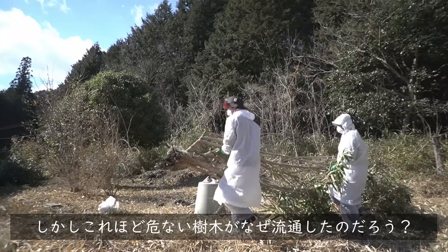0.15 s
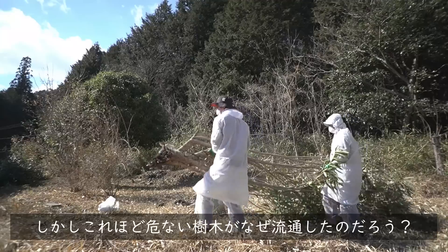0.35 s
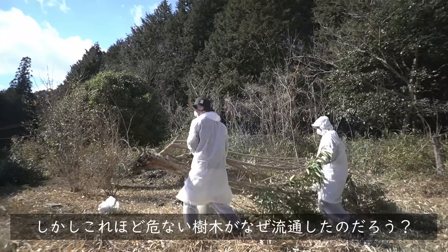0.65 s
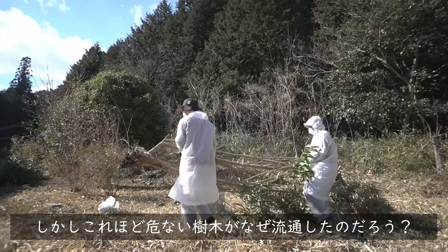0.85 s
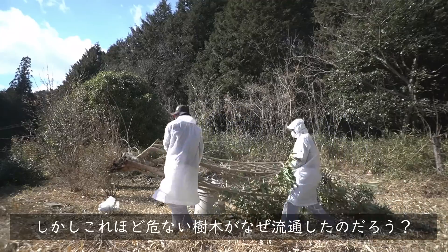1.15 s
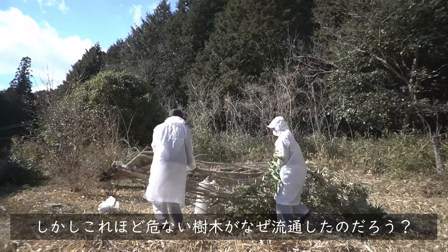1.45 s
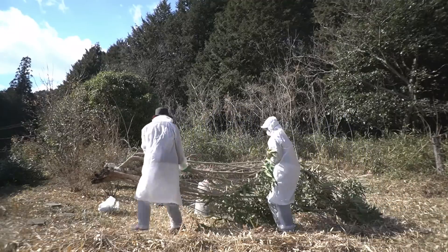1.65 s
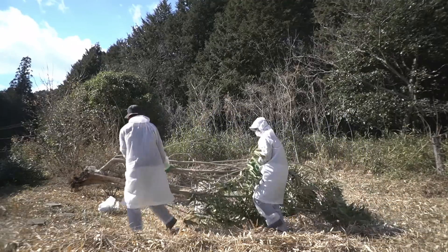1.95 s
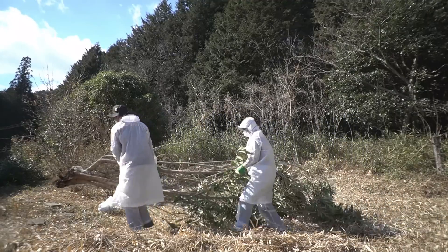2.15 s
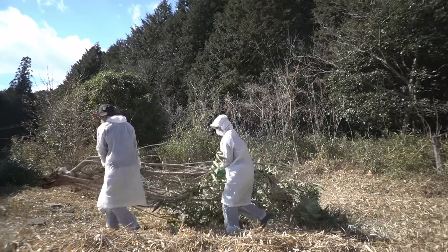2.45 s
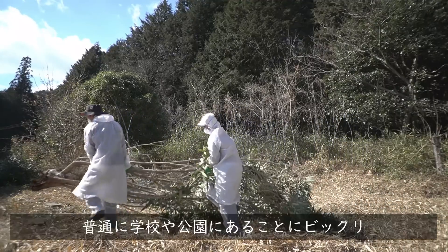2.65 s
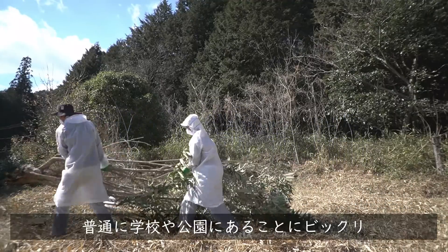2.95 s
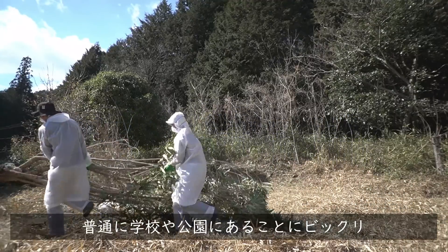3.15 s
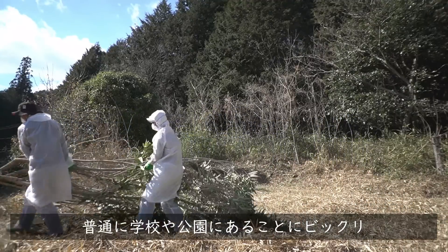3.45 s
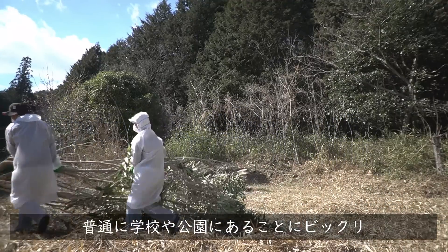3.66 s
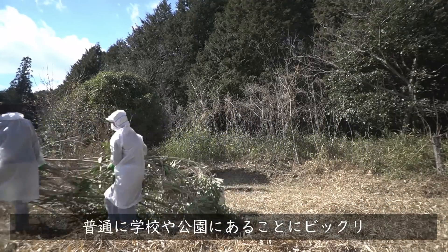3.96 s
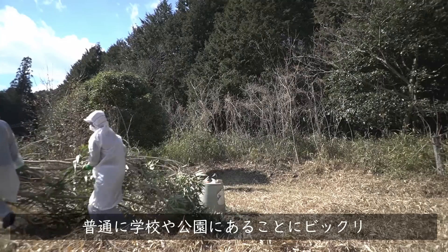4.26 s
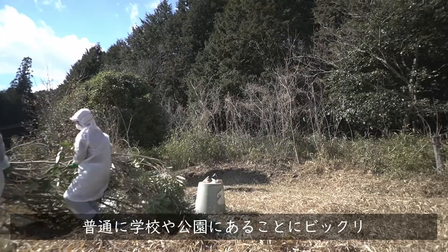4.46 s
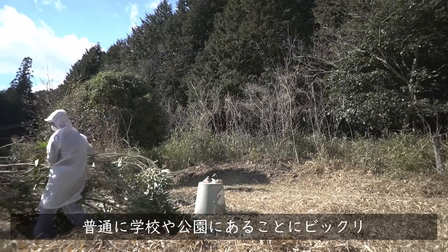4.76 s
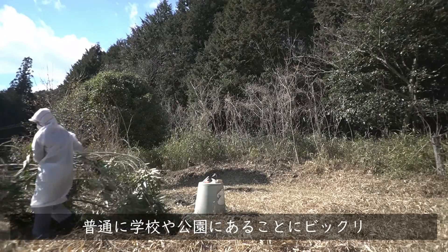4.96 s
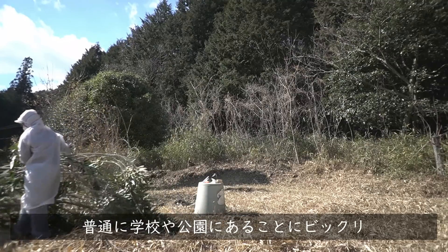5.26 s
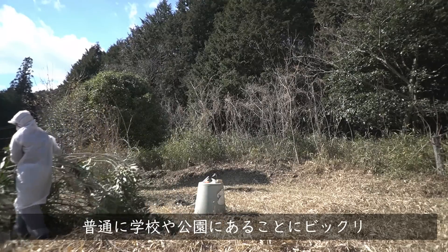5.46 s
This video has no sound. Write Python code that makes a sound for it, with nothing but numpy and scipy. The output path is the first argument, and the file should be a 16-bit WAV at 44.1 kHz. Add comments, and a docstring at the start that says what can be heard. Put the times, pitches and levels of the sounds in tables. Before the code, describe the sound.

Cut branches scrape and rustle through dry straw, beginning at the right with a few hollow bough knocks. The rustle grows fuller and brighter as it passes the middle, with leafy swishes, irregular dull footsteps and tiny high snaps, then moves left and eases slightly. Natural stereo pickup, open air, only a very short diffuse scatter and faint distant rumble.

```python
"""In a clearing, two people drag a load of leafy cut branches over dry grass, right to left past a microphone pair.
Leaves and straw crackle: dense random fractures, coloured and grouped into flurries, swish as sprays whip free.
Boughs scrape the soil (filtered slips) and knock together (damped resonances with a noisy scuff).
Boots thud on the turf (resonant noise) and crush straw; single dry stalks snap (short high resonances).
A faint outdoor rumble of low noise lies behind, and the clearing scatters a brief diffuse tail."""
import sys
import numpy as np
from scipy import signal
from scipy.fft import rfft, irfft, next_fast_len
from scipy.io import wavfile
from scipy.ndimage import uniform_filter1d

SR = 44100
rng = np.random.default_rng(int(sys.argv[2]) if len(sys.argv) > 2 else 0)


def log_audio(samples):
    """Write samples as a 16-bit WAV file to the path given in sys.argv[1]."""
    # one column per channel
    frames = np.atleast_2d(samples).T
    # limit to full scale, then quantise
    limited = np.clip(frames, -1, 1)
    pcm = np.round(limited * 32767).astype(np.int16)
    wavfile.write(sys.argv[1], SR, pcm)


N = 246519
TIME = np.arange(N) / SR


def undb(db):
    """Decibels to gain."""
    return 10 ** (np.asarray(db) / 20)


def unit(x):
    """Scale to an rms of one."""
    return x / np.sqrt(np.mean(x ** 2))


def impulse(t):
    """A single one at time zero, to set a resonance ringing."""
    return 1.0 * (t == 0)


def curves(table):
    """The columns of a table, joined by straight lines in time."""
    s, *columns = np.transpose(table)
    return [np.interp(TIME, s, column) for column in columns]


def colour(x, points):
    """Filter by a spectrum of (Hz, dB) points, joined by straight lines over log frequency."""
    hz, db = np.transpose(points)
    size = next_fast_len(N, True)
    freqs = np.maximum(np.fft.rfftfreq(size, 1 / SR), 1)
    gain = undb(np.interp(np.log(freqs), np.log(hz), db))
    return irfft(rfft(x, size) * gain, size)[..., :N]


def ring(x, hz, spread):
    """A damped resonance, reaching from hz / spread to hz * spread."""
    spread = max(spread, 1.05)
    edges = [hz / spread, min(hz * spread, 0.45 * SR)]
    return signal.sosfilt(signal.butter(2, edges, "band", fs=SR, output="sos"), x)


def walk(rate):
    """Random levels, each held 1 / rate seconds and slewed to the next; rms 1."""
    hold = max(int(SR / rate), 1)
    held = np.repeat(rng.standard_normal(N // hold + 2), hold)
    held = held[rng.integers(hold):][:N]
    return unit(uniform_filter1d(held, hold))


def clicks(rate, scatter_db):
    """Random tiny fractures, on average `rate` a second, of unequal size and either sign."""
    size_db = scatter_db * np.clip(rng.standard_normal(N), -2, 2)
    size = undb(size_db) * rng.choice([-1, 1], N)
    return unit(size * (rng.random(N) < rate / SR))


def flurries(rate, decay_s):
    """Twigs catch and spring free: jumps of activity that die away; mean 1."""
    releases = rng.random(N) * (rng.random(N) < rate / SR)
    activity = signal.lfilter([1], [1, -np.exp(-1 / (decay_s * SR))], releases)
    return activity / activity.mean()


def swell(s, rise_s):
    """A push that builds to one over rise_s and then lets go."""
    age = np.clip((TIME - s) / rise_s, 0, 20)
    return age ** 2 * np.exp(2 * (1 - age))


def add(out, s, sound):
    """Mix a short sound in at a time."""
    start = max(int(s * SR), 0)
    out[..., start:start + sound.shape[-1]] += sound[..., :N - start]


# The microphone pair. Each row: frequency in Hz, share of the bearing heard as level,
# share of the lag between the ports, right port's excess in dB.
MICROPHONE_PORTS = [(400, 0.03, 0, -0.5), (1100, 0.67, 0.4, 0.5), (1880, 0.32, 0, 1), (2580, 0.55, 0, 2.5),
                    (3500, 0.74, 1, 1.7), (5500, 0.75, 0.88, -0.2), (9000, 0.88, 0.67, -1),
                    (14000, 0.74, 0.65, -0.5)]
PORT_LAG_PER_DB = 0.35  # samples of lead at the nearer port for each dB of bearing


def ports(x, pan_db, size=256):
    """Two close microphone ports: the nearer one hears the treble earlier and louder."""
    hz, s, frames = signal.stft(x, SR, nperseg=size)
    edges, *columns = np.transpose(MICROPHONE_PORTS)
    shade, lag, excess_db = (np.interp(hz, edges, column)[:, None] for column in columns)
    pan = np.interp(s, TIME, pan_db + np.zeros(N))
    # half of the difference goes to each port
    level = undb((shade * pan - excess_db) / 2)
    lead = np.exp(1j * np.pi * hz[:, None] / SR * lag * PORT_LAG_PER_DB * pan)
    left = level * lead
    return signal.istft(np.array([frames * left, frames / left]), SR)[1][:, :len(x)]


# Colour of the distant rumble. Each row: frequency in Hz, relative level in dB.
RUMBLE_COLOUR = [(15, -22), (30, -8), (48, -0.5), (85, 2), (135, 1), (160, -8.5), (300, -9.5), (900, -14.5),
                 (4000, -29.5)]


def air():
    """Distant low rumble, nearly alike at both ports: coloured noise with a slightly wandering level."""
    noise = rng.standard_normal(N) + undb(-21.5) * rng.standard_normal((2, N))
    return unit(colour(noise, RUMBLE_COLOUR)) * undb(-47.5 + 1.2 * walk(2.57))


# Sound scattered by ground and foliage, relative to what is sent into the clearing.
# Each row: frequency in Hz, level in dB.
SCATTER_COLOUR = [(100, -30), (300, -15), (600, -12.5), (1100, -10.5), (1800, -24), (2700, -13.5),
                  (3700, -10), (8000, -14), (16000, 1.5)]


def clearing(x, decay_s=0.0069, size=256):
    """Countless swaying twigs and blades scatter the sound into a brief diffuse tail, different at each port."""
    power = abs(signal.stft(colour(x, SCATTER_COLOUR), SR, nperseg=size)[2]) ** 2
    keep = np.exp(-size / 2 / (decay_s * SR))  # power kept from one frame to the next
    tail = np.sqrt(signal.lfilter([1 - keep], [1, -keep], power))
    paths = signal.stft(rng.standard_normal((2, N)), SR, nperseg=size)[2]
    return signal.istft(tail * paths / paths.std(), SR)[1][:, :N]


# Boots on the turf. Each row: start in seconds, reference level in dB (thud, heel and crunch are offset from it),
# pitch in Hz, time to the full weight in seconds.
BOOT_STEPS = [(0.025, -38, 65.7, 0.015), (0.985, -35.5, 320, 0.028), (1.66, -43.5, 302, 0.036),
              (1.755, -37, 280, 0.015), (2.015, -49, 50, 0.025), (2.19, -41, 378, 0.015),
              (2.315, -37.5, 310, 0.042), (2.42, -40, 72, 0.025), (2.945, -37, 300, 0.013),
              (3.135, -41, 172, 0.017), (3.405, -41.5, 340, 0.013), (3.46, -44, 109, 0.018),
              (3.99, -42, 380, .025), (4.55, -33.5, 108, 0.0142), (5.2, -40.5, 330, 0.027),
              (5.541, -33, 175, 0.011)]
# Colour of straw crushed by a boot. Each row: frequency in Hz, relative level in dB.
CRUNCH_COLOUR = [(400, -3), (1200, -4), (2300, -6), (5000, -6), (10000, -17), (16000, -19)]
THUD_DB, HEEL_DB, CRUNCH_DB = -1.1, 3.5, -1.0  # relative to the level of the step; the heel's is a peak


def steps():
    """Each boot loads the turf with a dull thud, its heel strikes, and it crushes the straw under it."""
    thuds, weight = np.zeros(N), np.zeros(N)
    for s, db, hz, rise_s in BOOT_STEPS:
        load = swell(s, rise_s) * undb(db)
        thuds += undb(THUD_DB) * load * unit(ring(rng.standard_normal(N), hz, 1.75))
        heel = ring(impulse(TIME[:4096]), hz, 1.6)
        add(thuds, s + rise_s / 2, heel / abs(heel).max() * undb(db + HEEL_DB))
        weight += load
    straw = unit(colour(clicks(rate=3000, scatter_db=5), CRUNCH_COLOUR))
    return thuds + undb(CRUNCH_DB) * weight * straw


# Boughs knocking. Each row: start in seconds, peak of the blow in dB, pitch in Hz.
BOUGH_KNOCKS = [(0.359, -23, 437), (0.462, -29.5, 398), (0.488, -30, 240), (0.596, -28, 654),
                (1.145, -26, 430), (2.961, -32, 581), (4.158, -34, 310)]
KNOCK_SCUFF_DB = -12.5  # starting rms of the bark's scuff, relative to the peak of the blow


def knocks():
    """Green wood strikes and scuffs; damped by its leaves, it rings for only a cycle or two."""
    out, t = np.zeros(N), TIME[:4096]
    for s, db, hz in BOUGH_KNOCKS:
        blow = ring(impulse(t), hz, 1.68)
        blow = blow / abs(blow).max()
        scuff = unit(ring(rng.standard_normal(len(t)), hz, 1.27)) * np.exp(-t / 0.013)
        add(out, s, (blow + undb(KNOCK_SCUFF_DB) * scuff) * undb(db))
    return out


# Dry stalks snapping. Each row: start in seconds, peak at the louder port in dB, pitch in Hz,
# bearing as left minus right in dB.
STALK_SNAPS = [(1.860, -12, 9100, -1), (2.212, -9, 9600, 0), (2.3697, -6, 10000, 6.5),
               (3.277, -13, 9800, 1), (3.5526, -7, 7800, 2), (3.952, -10, 9500, 0), (4.3365, -5, 12500, 3),
               (4.754, -12, 4500, 9), (4.9004, -11, 10000, 9), (5.1694, -7, 9000, 4),
               (5.198, -12, 10000, 7)]


def snaps():
    """A stalk breaks with one crack and a few splinters; the thinner it is, the higher."""
    out, t = np.zeros((2, N)), TIME[:512]
    for s, db, hz, pan_db in STALK_SNAPS:
        splinters = 0.1 * rng.standard_normal(len(t)) * np.exp(-t / 0.0025)
        crack = ring(impulse(t) + splinters, hz, 1.4)
        heard = ports(np.pad(crack, (32, 0)), pan_db)  # room for the port that leads
        add(out, s, heard / abs(heard).max() * undb(db))
    return out


# How hard the load is pulled through the straw. Each row: time in seconds, pull as a rustle level in dB.
DRAG_PULL = [(0.0, -31.5), (0.2, -38), (0.52, -31.7), (0.74, -31.5), (1.08, -34.5), (1.47, -34.5),
             (1.88, -30), (2.3, -30), (2.55, -30), (2.82, -30), (3.2, -27.5), (3.47, -30), (4.08, -29.5),
             (4.35, -31), (4.72, -31.5), (5.02, -34.5), (5.28, -31), (5.59, -33.5)]
USUAL_DRAG_DB = -31


def pulled(law, pan_db):
    """The gain of a layer, from the pull on the load and from where it has got to."""
    db, per_pull, per_bearing = law
    drag_db, = curves(DRAG_PULL)
    return undb(db + per_pull * (drag_db - USUAL_DRAG_DB) + per_bearing * pan_db)


# Colours of scraped soil and crunched twigs. Each row: frequency in Hz, relative level in dB.
SOIL_COLOUR = [(90, -22), (170, 0), (240, -1), (440, 2), (640, -0.5), (900, -13.5), (1400, -14.5),
               (3000, -23)]
TWIG_COLOUR = [(300, -24), (700, -5), (1100, -3.5), (1600, -1), (2200, 2), (2800, -2.5), (5000, -47)]
# How soil and twigs follow the pull: gain in dB at the usual pull straight ahead, dB per dB of pull,
# dB per dB of bearing to the left.
SOIL_PULL = (-45.0, 0.79, -0.038)
TWIG_PULL = (-39, 0.7, 0.13)
SWISH_TWIGS_DB = -4  # twigs crunching along with a swish, relative to the swish gain of the stems


def boughs(pan_db, stem_swish):
    """Heavy wood sticks and slips over the soil and crunches the twigs beneath it."""
    slips = clicks(rate=1500, scatter_db=1.5) * np.sqrt(1 + 0.26 * flurries(rate=36, decay_s=0.021))
    cracks = clicks(rate=5000, scatter_db=3.5) * np.sqrt(1 + 0.29 * flurries(rate=35, decay_s=0.0093))
    scrape = unit(colour(slips, SOIL_COLOUR)) * pulled(SOIL_PULL, pan_db)
    twig_gain = np.hypot(pulled(TWIG_PULL, pan_db), undb(SWISH_TWIGS_DB) * stem_swish)
    crunch = unit(colour(cracks, TWIG_COLOUR)) * twig_gain
    return ports(scrape + crunch, pan_db)


# Sprays that catch and swish free. Each row: start in seconds, leaf gain in dB and stem gain in dB
# (both before the boost for bearing), time to the peak in seconds.
SPRAY_SWISHES = [(-0.015, -33.5, -37, 0.022), (0.39, -45, -44, .035), (0.98, -36, -52, 0.024),
                 (1.135, -40, -42, 0.02), (2.15, -34.5, -51, 0.054), (2.35, -34, -41, 0.014),
                 (2.46, -33, -45, .02), (2.87, -31, -39.5, 0.057), (3.08, -44, -33, 0.023),
                 (3.235, -46, -33, 0.036), (3.52, -37, -48, 0.064), (3.935, -33.5, -36.5, .05),
                 (4.19, -39, -34, 0.02), (4.545, -37, -38, 0.016), (4.65, -37.5, -46, .035),
                 (4.86, -35, -38.5, 0.032), (5.15, -40, -39.5, 0.034)]


def swishes():
    """Caught sprays bend and whip free: the gain that this gives to leaves and to stems."""
    leaves, stems = np.zeros(N), np.zeros(N)
    for s, leaf_db, stem_db, rise_s in SPRAY_SWISHES:
        push = swell(s, rise_s)
        leaves += push * undb(leaf_db)
        stems += push * undb(stem_db)
    return leaves, stems


def spray(spectrum, rate, scatter_db, sway_db):
    """One bunch of stems or leaves: dense tiny fractures that come in flurries, swelling as it sways."""
    activity = np.sqrt(1 + 0.5 * flurries(rate=50, decay_s=0.0074))
    return unit(colour(clicks(rate, scatter_db) * activity, spectrum)) * undb(sway_db * walk(26))


# Colours of crackling stems and leaves. Each row: frequency in Hz, relative level in dB.
STEM_COLOUR = [(900, -32), (1600, -11), (2300, -3.5), (3600, 0.5), (5200, -0.5), (7000, -3), (9500, -10),
               (16000, -21.5)]
LEAF_COLOUR = [(2000, -16), (4500, -6.5), (7000, -1), (9500, 1), (13000, 0.5), (16000, -5)]
# How each spray's stems and leaves follow the pull: gain in dB at the usual pull straight ahead,
# dB per dB of pull, dB per dB of bearing to the left (before the boost for bearing).
STEM_PULL = (-36.6, 1, -0.059)
LEAF_PULL = (-36.5, 1, 0.039)


def foliage(pan_db, leaf_swish, stem_swish):
    """Sprays along the load crackle through the straw, each from its own direction."""
    # off to one side the ports' treble is out of step, so each carries more than their sum
    stem_gain = np.hypot(pulled(STEM_PULL, pan_db), stem_swish) * undb(0.12 * abs(pan_db))
    leaf_gain = np.hypot(pulled(LEAF_PULL, pan_db), leaf_swish) * undb(0.37 * abs(pan_db))
    out = 0
    for place in np.linspace(-1, 1, num=4):
        stems = spray(STEM_COLOUR, rate=7500, scatter_db=3.5, sway_db=1.47)
        leaves = spray(LEAF_COLOUR, rate=6000, scatter_db=2.5, sway_db=0.9)
        out = out + ports(stems * stem_gain + leaves * leaf_gain, pan_db + 3.8 * place)
    return out


# Where the load is. Each row: time in seconds, bearing as left minus right in dB.
LOAD_BEARING = [(0.0, -4.5), (1.35, -3.5), (2.05, -2.5), (2.4, 1.5), (2.75, -0.5), (4.62, 5.5), (5.59, 7.5)]
CLEARING_ECHO_DB = 0.3  # gain into the clearing when the load is straight ahead


def scene():
    """The load passes from right to left; the further off to a side, the more of it arrives scattered."""
    pan_db, = curves(LOAD_BEARING)
    leaf_swish, stem_swish = swishes()
    wood = knocks() + snaps() + boughs(pan_db, stem_swish)
    direct = steps() + wood + foliage(pan_db, leaf_swish, stem_swish)
    to_clearing = direct.mean(axis=0) * undb(0.49 * abs(pan_db) + CLEARING_ECHO_DB)
    return air() + clearing(to_clearing) + direct


def record(dry):
    """The camera's microphone channel cuts the top steeply, above 15950 Hz."""
    return signal.sosfilt(signal.ellip(12, 0.1, 80, 15950, fs=SR, output="sos"), dry)


dry = scene()
out = record(dry)
log_audio(out)
```